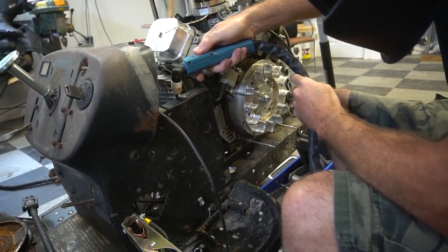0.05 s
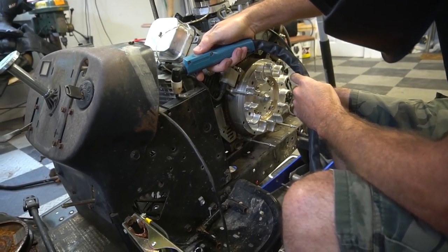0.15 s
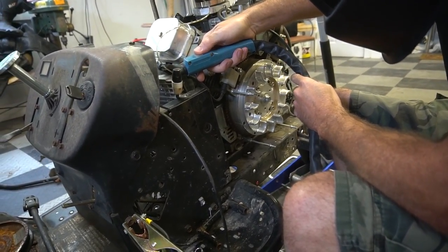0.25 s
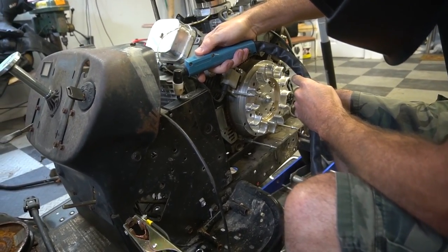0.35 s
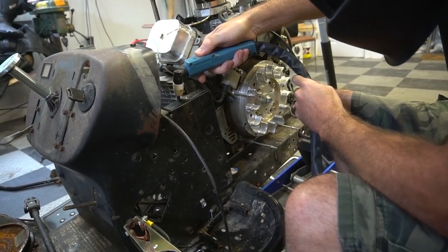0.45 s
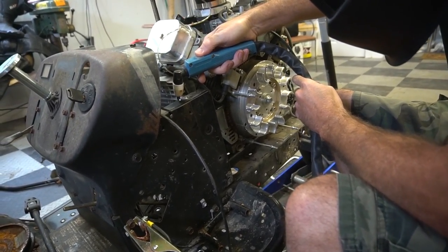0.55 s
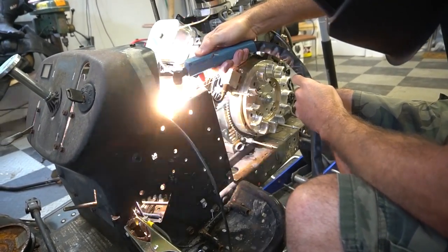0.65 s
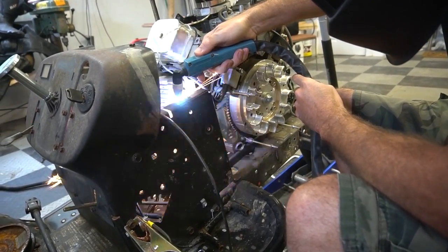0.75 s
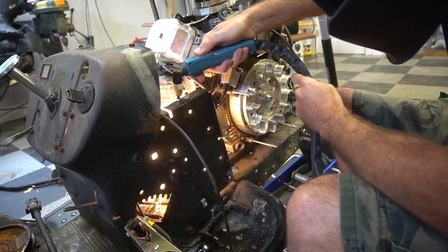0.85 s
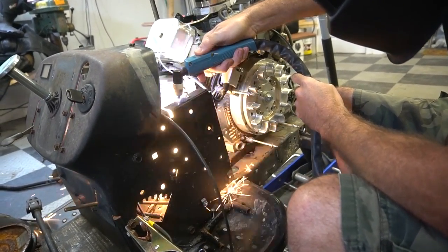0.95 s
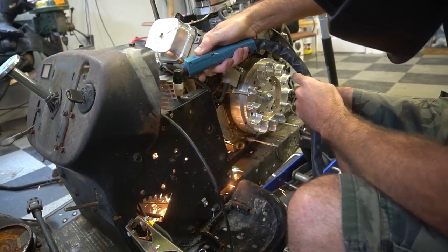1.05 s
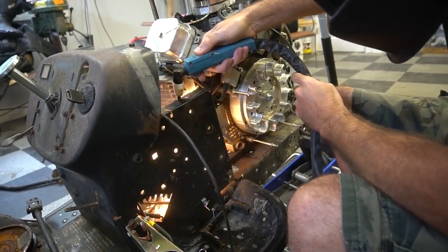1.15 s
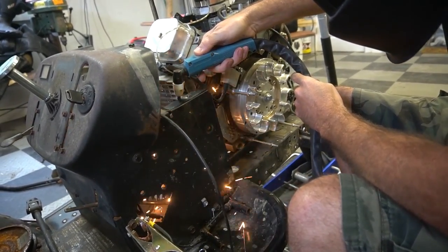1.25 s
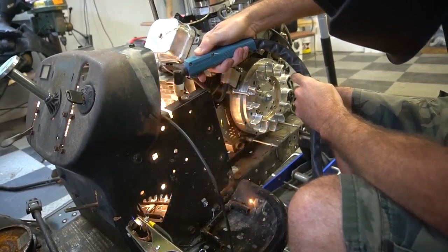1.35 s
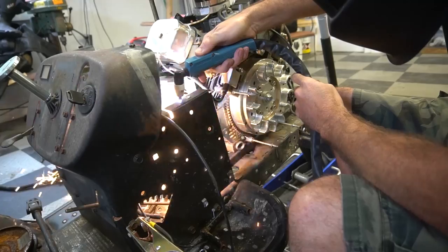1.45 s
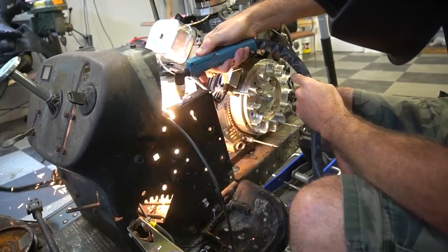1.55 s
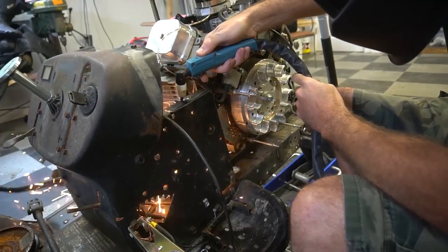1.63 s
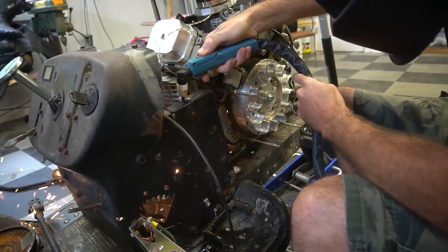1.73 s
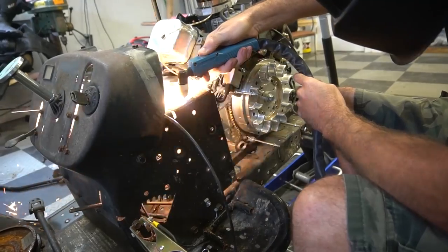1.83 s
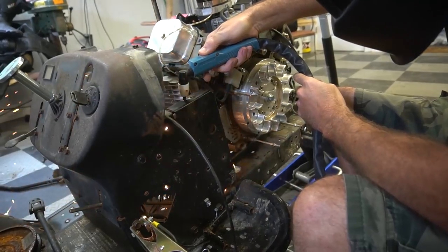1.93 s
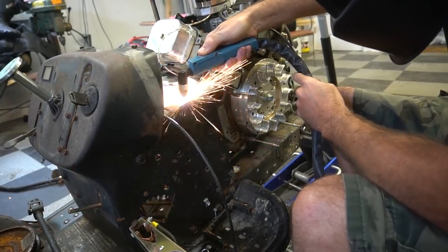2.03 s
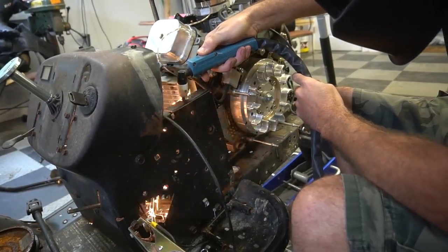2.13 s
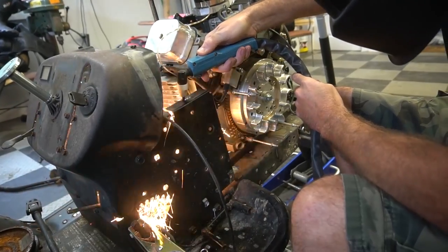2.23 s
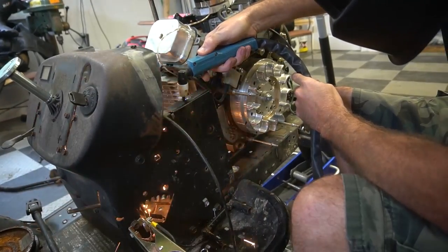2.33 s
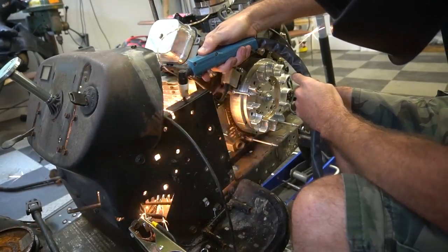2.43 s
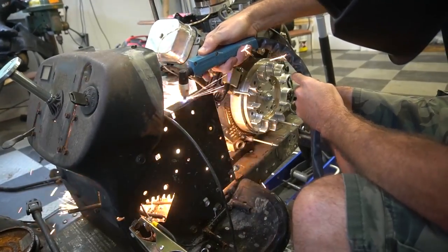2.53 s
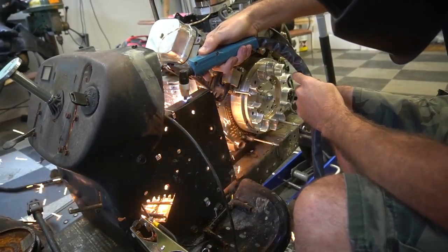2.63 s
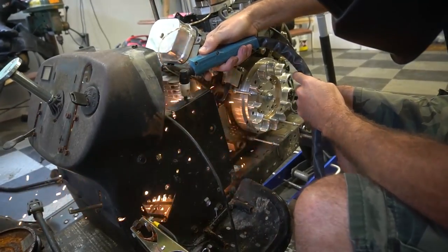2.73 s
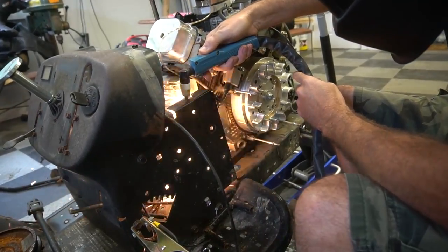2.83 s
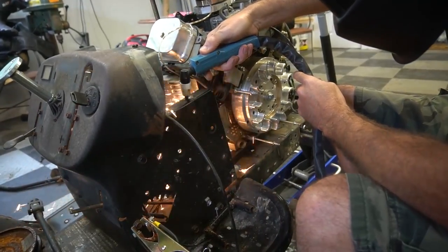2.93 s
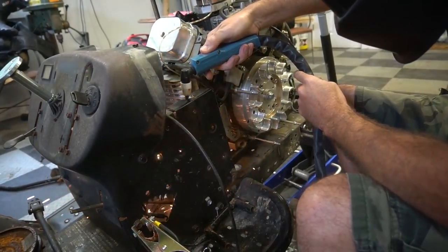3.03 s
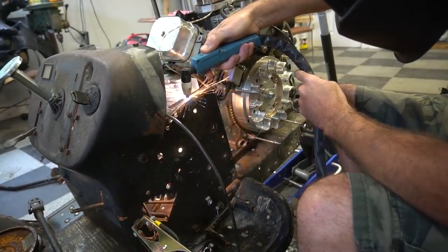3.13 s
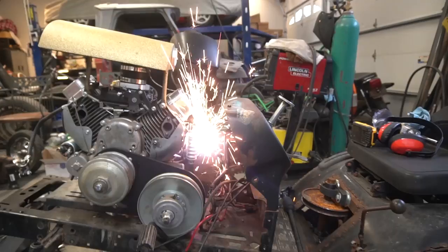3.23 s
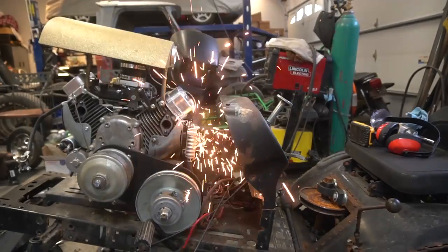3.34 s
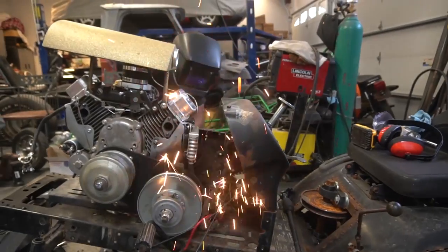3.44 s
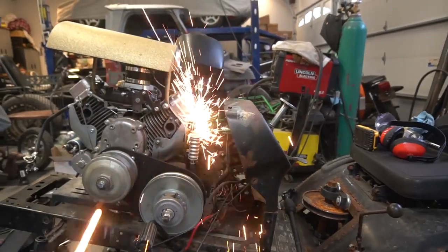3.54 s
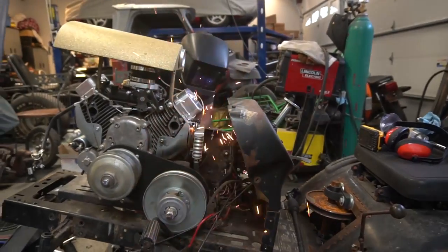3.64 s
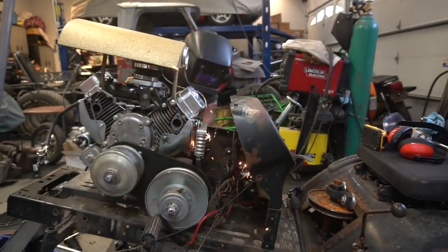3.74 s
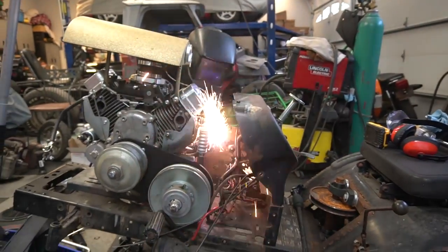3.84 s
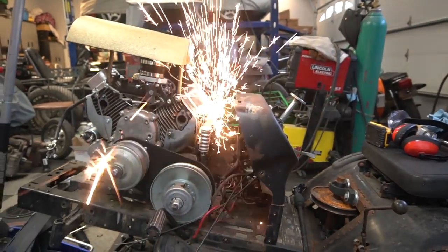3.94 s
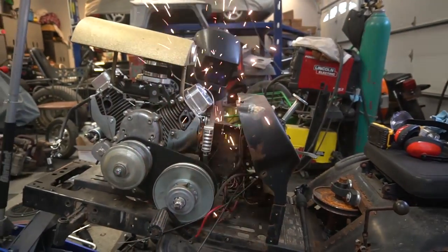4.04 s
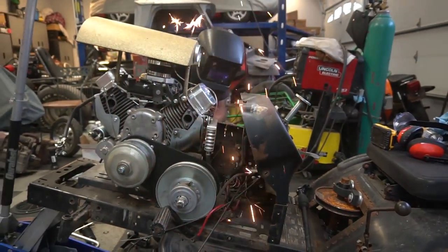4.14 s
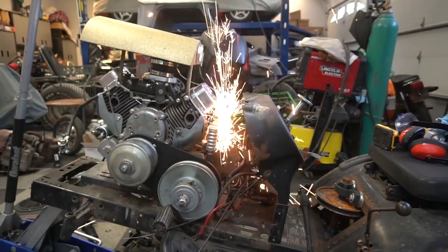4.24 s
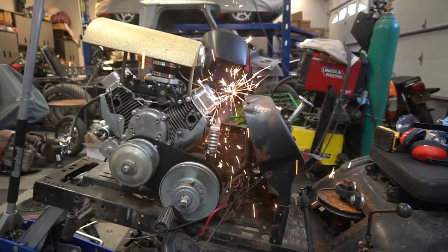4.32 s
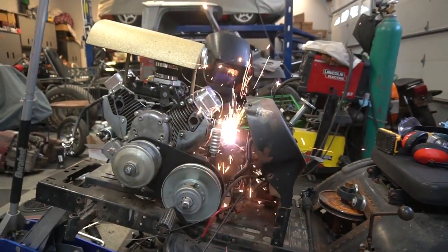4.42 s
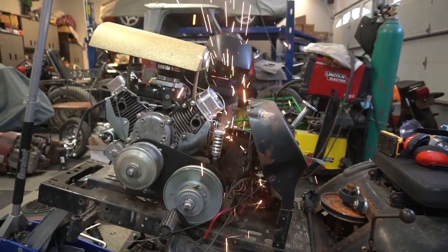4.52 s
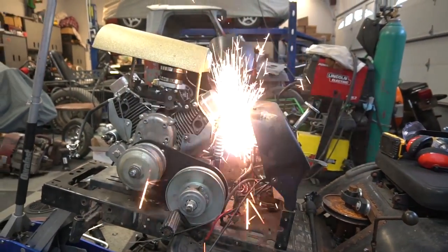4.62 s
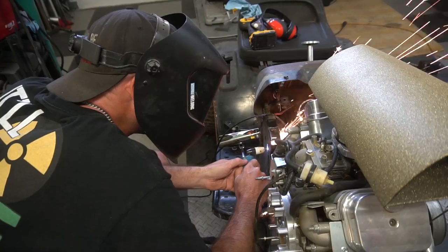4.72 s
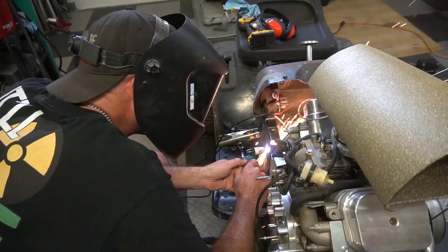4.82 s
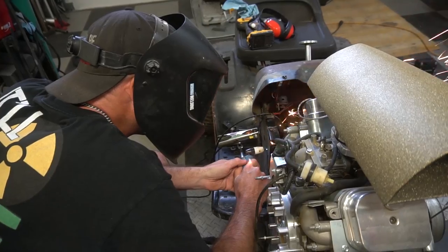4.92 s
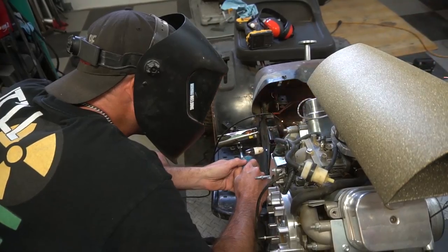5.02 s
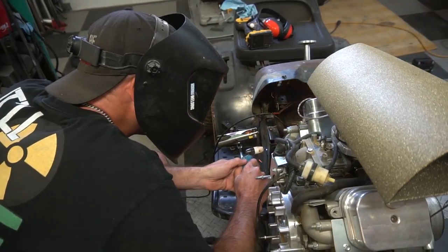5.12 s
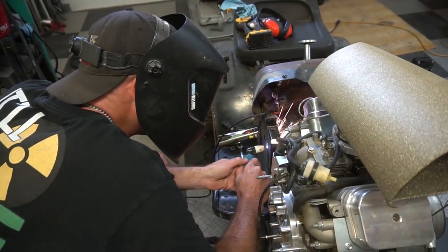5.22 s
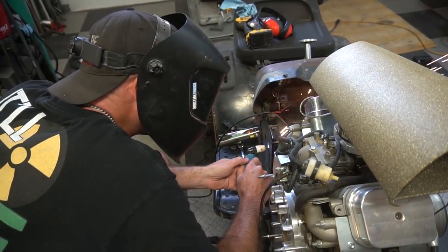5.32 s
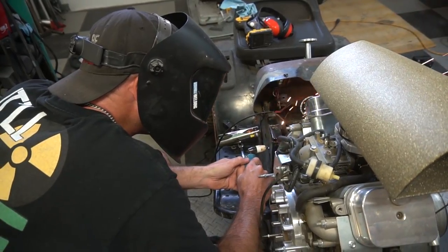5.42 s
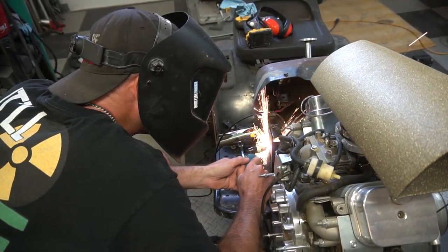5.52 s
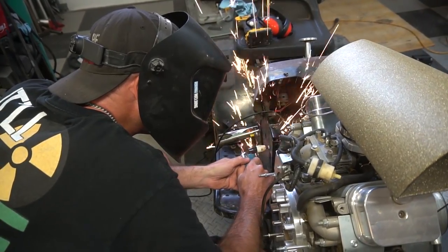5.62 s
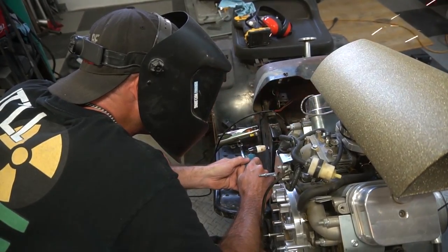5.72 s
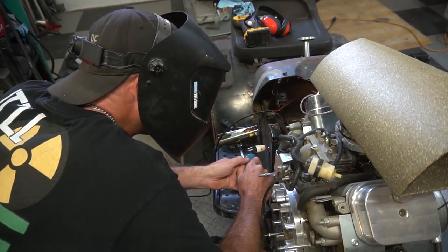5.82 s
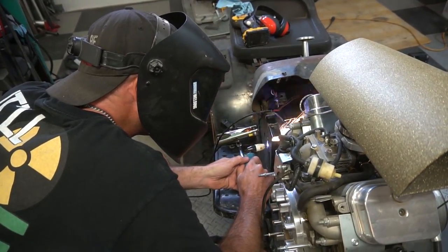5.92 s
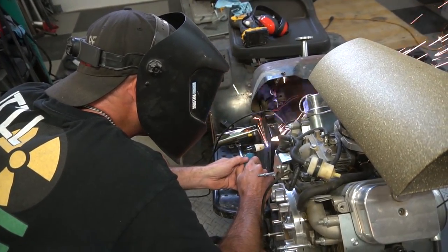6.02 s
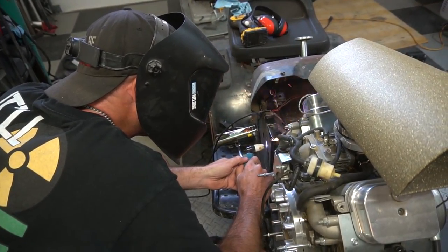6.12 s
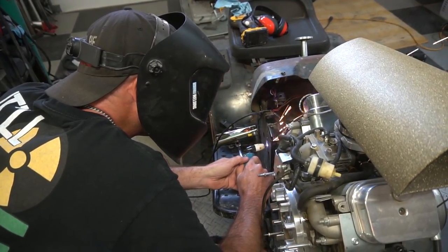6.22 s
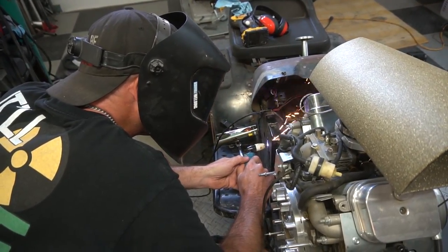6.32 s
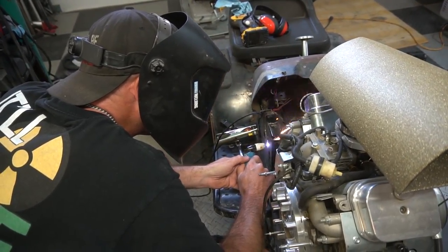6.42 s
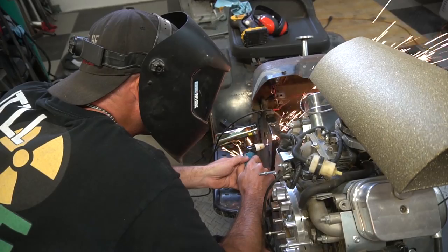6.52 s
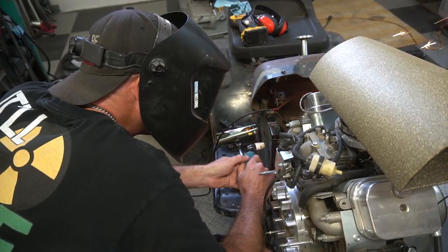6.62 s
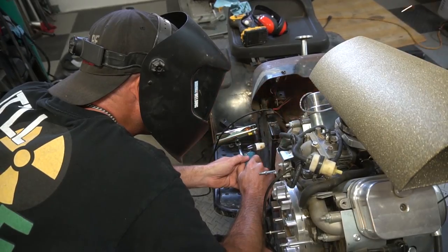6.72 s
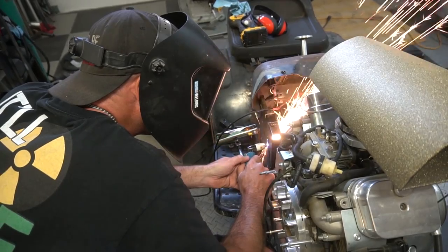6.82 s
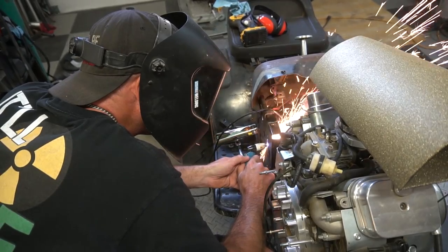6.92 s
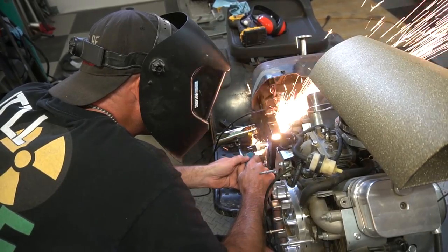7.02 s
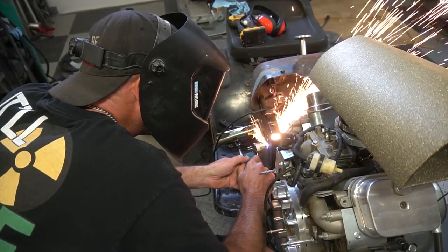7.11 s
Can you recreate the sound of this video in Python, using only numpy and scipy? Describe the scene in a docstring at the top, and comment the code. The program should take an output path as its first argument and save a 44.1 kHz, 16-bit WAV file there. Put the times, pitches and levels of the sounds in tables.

```python
"""A plasma torch in a garage. A quiet fan is heard first; at 0.6 s the valve ticks open and air hisses out.
Then the arc stutters: each strike cracks and thumps as the gas swells, the burning arc roars over the jet, and
its collapse sucks back with a low pop, while the machine frame rings along. The first arcs roar louder, until
the metal is pierced. At 3.3 s and 4.7 s the scene changes to another place with its own colour, three places in
all, heard in mono."""
import sys
import numpy as np
from scipy import signal
from scipy.io import wavfile
from scipy.ndimage import uniform_filter1d

SR = 44100
rng = np.random.default_rng(int(sys.argv[2]) if len(sys.argv) > 2 else 0)


def dump(signal):
    """Clip the signal to [-1, 1] and save it as 16-bit WAV at the path in sys.argv[1]."""
    limited = np.clip(np.atleast_2d(signal).T, -1, 1)
    pcm = np.round(limited * 32767).astype(np.int16)
    wavfile.write(sys.argv[1], SR, pcm)


N = 315880
T = np.arange(N) / SR
HZ = np.fft.rfftfreq(4096, 1 / SR)

# tone of the fan and stray air: (frequency [Hz], relative level [dB])
FAN_COLOUR = [(15, -20), (40, -6), (90, -6.5), (145, -17), (200, -9.5), (450, -19.5), (1000, -23.5),
              (2500, -22), (3000, -20.5), (4200, -25), (6000, -29), (7500, -28), (9400, -22),
              (11000, -27.5), (12500, -34), (15800, -36)]
# humps in the fan noise: (frequency [Hz], width [Hz], gain [dB])
FAN_HUMPS = [(286.4, 22, 12.5), (403, 23, 5.5), (576, 65, 13.5), (843, 66, 8)]
# fader of the fan bed: (time [s], level [dB])
FAN_LEVEL = [(0, -48.5), (.3, -51), (.58, -56.5), (1, -60), (7.16, -61)]
# decay of the garage: (frequency [Hz], t60 [s])
GARAGE_DECAY = [(100, 0.73), (500, 0.45), (2000, 0.59), (6000, 0.64), (15000, 0.3)]
# two dull knocks and a soft low bump: (time [s], level [dB], frequency [Hz], t60 [s])
BUMPS = [(1, -35, 280, 0.03), (.617, -36, 320, 0.022), (0.57, -39, 85, 0.051)]
# sharp ticks of the valve: (time [s], relative level [dB])
VALVE_TICKS = [(.6082, -18), (.6146, -20)]
# faders of the air jet: (time [s], bass level [dB], treble level [dB])
JET_LEVELS = [(0.589, -42, -73), (0.603, -36, -45), (0.63, -38, -37.5), (0.67, -41, -32),
              (0.712, -27, -30.5), (0.9, -28.5, -28.5), (1.8, -30, -26.5), (2.75, -30.5, -29),
              (3.19, -30.5, -27), (3.35, -37, -37), (4.1, -36, -35), (4.6, -33, -36.5), (5.0, -34.5, -31),
              (5.85, -37, -35), (6.8, -39, -35), (7.16, -36, -33.5)]
# tone of jet and arc: (frequency [Hz], jet at each place [dB] x 3, arc at each place [dB] x 3)
JET_ARC_COLOURS = [(40, -25, -53, -51, -28, -40, -51), (99, -13.5, -14.5, -24, 2, -19, -46),
                   (249, -11, -12, -14, -12, -36, 7), (513, -9.5, -8, -8, -7.5, -6, -7),
                   (844, -6, -12, -15, 8.5, -12, -7), (1250, -9.5, -4.5, -8, 8.5, -0.5, 4.5),
                   (1850, -4.5, -4.5, -6, 7, 1.5, 6), (3320, -4, -3.5, -6.5, 1.5, 1, 5.5),
                   (4300, -4, -6, -7.5, -1.5, -5, 1), (6270, -2.5, -5.5, -10, -0.5, -4.5, 2.5),
                   (7600, -1, -4.5, -4.5, -1, -5.5, 1.5), (11000, -2, -1.5, -9, 1.5, -5.5, 0.5),
                   (13300, 0.5, -0.5, -6.5, 4, -5.5, 1), (14900, -0.5, -4, -9, 0, -5.5, 0),
                   (16300, -3.5, -0.5, -2.5, 4, -11.5, -15)]
# per place, peaks and dips from the frame's hollows: (frequency [Hz], width [Hz], gain [dB])
HOLLOWS = [
    [(464, 270, 0), (644, 49, -1.5), (1010, 34, -9), (1370, 64, 2.5), (1515, 82, -7), (1750, 190, 4),
     (2130, 51, 6), (3023, 69, 7.5), (3500, 160, 5), (5030, 250, 5), (5370, 460, -4.5), (9170, 200, 5),
     (10130, 110, 6), (10980, 470, 5)],
    [(680, 50, -6), (1290, 90, 2), (1440, 58, -10), (2197, 34, 8), (2500, 62, -1), (2800, 41, -7),
     (3700, 70, 1.5), (3990, 72, 6.5), (7600, 200, 4.5), (8700, 200, 4.5), (10400, 200, 3.5),
     (10800, 240, 3), (12400, 200, -1), (14900, 150, -7)],
    [(273, 88, 1), (480, 140, -9.5), (573, 36, 5.5), (855, 120, 8), (1450, 72, -3), (1526, 52, -8.5),
     (1732, 43, 2), (2520, 29, 4), (3370, 120, 3.5), (3850, 140, 3), (5380, 77, 3.5), (7750, 190, 3),
     (8850, 470, 4), (10700, 290, 5.5)],
]
# per place, ringing sheet and cavities of the frame: (frequency [Hz], relative level [dB], t60 [s])
FRAME_MODES = [
    [(696, -4.5, 0.025), (1081, -1.5, 0.031), (1310, -2.5, 0.013), (2154, 2, 0.017), (2980, -19, 0.017)],
    [(860, -17, 0.033), (1290, 2, 0.016), (2210, 4, 0.031), (2530, 4, 0.026), (3970, -10, .015)],
    [(582, -16, 0.064), (900, -31, 0.053), (1094, -19, 0.08), (1342, 1, 0.023), (1765, 1, 0.027),
     (2520, 0.5, 0.028), (3140, -7, 0.027), (3820, -3, 0.018)],
]
# per place, swelling or collapsing gas: (frequency [Hz], relative level [dB], t60 [s])
POP_MODES = [
    [(306, 3.5, 0.013), (114.4, -8, 0.019), (840, 4, 0.0069)],
    [(370, 2.5, 0.012), (114, -6, 0.015), (886, -9.5, 0.023)],
    [(322, 4, 0.012), (109, -11, 0.02), (884, -5.5, 0.014)],
]
# tone of the crack: (frequency [Hz], relative level at each place [dB] x 3)
CRACK_COLOURS = [(306, -25, -6, -22.5), (1060, -1, 0.5, 0.5), (2030, 4, -5, 2.5), (4040, 2, -12, -8),
                 (8160, 8, -24, -37), (15800, -20, -18, -38)]
# per place, envelope of the crack: (attack [s], decay [s], noise trim [dB])
CRACK_SHAPES = [(.0001, 0.005, 4), (.0005, 0.0024, -3.5), (.002, 0.0036, -3)]
# cue list of arcs, levels before trims: (strike [s], collapse [s], crack [dB], pop [dB], fizz [dB])
ARCS = [(.7171, .7769, -24, -34, -24), (.8334, .8693, -27, -32, -25), (.8949, 0.927, -27, -32, -24.5),
        (0.9974, 1.036, -30, -34, -23.5), (1.161, 1.203, -31, -34, -24), (1.3647, 1.41, -25, -35, -28.5),
        (1.4504, 1.478, -29.5, -33.5, -26), (1.522, 1.552, -29, -33, -29), (1.559, 1.57, -46, -44, -34),
        (1.6024, 1.6356, -31.5, -35.5, -26.5), (1.8823, 1.9277, -27.5, -35, -31),
        (2.1165, 2.159, -25, -34, -35), (2.243, 2.28, -32, -35, -26.5), (2.4488, 2.487, -27.5, -36, -25),
        (2.553, 2.5932, -30, -33.5, -25), (2.6215, 2.6511, -28, -35.5, -24),
        (2.726, 2.7604, -28, -35, -25.5), (2.8758, 2.91, -27, -35.5, -24.5),
        (2.961, 2.9867, -28.5, -38, -25), (3.22, 3.2594, -29.5, -36, -24),
        (3.2595, 3.3304, -37, -35, -29.5), (3.5451, 3.597, -41, -35.5, -26.5),
        (3.901, 3.9741, -38, -36.5, -28.5), (4.2313, 4.316, -41, -45, -29.5),
        (4.452, 4.522, -24, -36.5, -28.5), (4.6535, 4.72, -42, -38.5, -29.5),
        (4.724, 4.7653, -21.5, -33.5, -33.5), (4.794, 4.832, -21.5, -36, -35),
        (4.8612, 4.915, -21, -39, -29), (5.2566, 5.3141, -20, -35, -30),
        (5.3452, 5.3734, -21.5, -34.5, -30), (5.409, 5.449, -20, -37, -32), (5.592, 5.673, -34, -40, -31),
        (5.998, 6.0662, -22.5, -35.5, -33), (6.0887, 6.1153, -21, -34.5, -30.5),
        (6.1335, 6.155, -28, -35, -30.5), (6.1844, 6.2317, -21, -34, -32), (6.2545, 6.28, -20, -35, -30),
        (6.303, 6.3321, -30, -32.5, -31), (6.3479, 6.382, -23.5, -35, -29.5),
        (6.4025, 6.4324, -19.5, -36, -31.5), (6.455, 6.4807, -29, -36.5, -31.5),
        (6.5057, 6.5556, -18.5, -42, -31.5), (6.8385, 6.932, -34.5, -40.5, -33),
        (6.968, 7.0229, -34, -37.5, -34.5), (7.0543, 7.13, -25.5, -39, -34), (7.157, 7.187, -27, -39, -35)]
STRIKE, COLLAPSE, CRACK_DB, POP_DB, FIZZ_DB = np.transpose(ARCS)

CHANGES_S, CROSSFADE_S = [3.3, 4.715], 0.047  # the scene changes from one place to the next
# one value per place
REVERB_DB, ROAR_TRIM_DB = [-10, -9, -7], [-11.5, -5, -5]
THUMP_DB, COLLAPSE_RING_DB = [1.5, 0.5, -4], [3, -3, 6]  # trims on each arc's pop level
THUMP_LAG_S = [0.00017, 0.00026, 0.00312]  # behind the crack

SAG_DB, SAG_S = -1, 0.06  # the jet ducks after each collapse
HEAT_DB, HEAT_S = 2.5, 0.062  # each arc leaves the jet's bass louder for a while
PIERCE_DB, PIERCE_S = 6, 0.6  # extra roar until the metal is pierced
LINGER_S = 0.0027  # the roar outlasts the collapse
REFILL_S = 0.0099  # a strike right after a collapse finds the gas still hot and barely thumps


def amp(db):
    """Gain of a level in dB."""
    return 10 ** (np.asarray(db) / 20)


def curve(points, hz=HZ):
    """Reads a (frequency, value) table along log frequency."""
    f, value = np.transpose(points)
    return np.interp(np.log(hz + 1), np.log(f + 1), value)


def tone(table, column):
    """EQ curve from one dB column of a colour table."""
    return amp(curve(np.array(table)[:, [0, column]]))


def humps(bells):
    """EQ curve of bell-shaped peaks and dips."""
    return amp(sum(db / (1 + (2 * (HZ - hz) / width) ** 2) for hz, width, db in bells))


def coloured(x, gain):
    """Minimum-phase EQ of unit energy."""
    log_gain = np.log(np.maximum(gain / gain.max(), 1e-5))
    mirrored = np.concatenate([log_gain, log_gain[-2:0:-1]])
    taps = np.fft.ifft(np.exp(np.conj(signal.hilbert(mirrored)))).real
    return signal.oaconvolve(x, taps / np.linalg.norm(taps))[:N]


def crossover(bass, treble, gain):
    """Joins two noises at 4 kHz under one EQ curve."""
    low = 1 / (1 + (HZ / 4000) ** 4)
    share = np.sum(gain ** 2 * low) / np.sum(gain ** 2)
    return (np.sqrt(share) * coloured(bass, gain * np.sqrt(low))
            + np.sqrt(1 - share) * coloured(treble, gain * np.sqrt(1 - low)))


def train(times, sizes):
    """Impulses at the given times, with one size for all or one each."""
    at = np.round(np.asarray(times) * SR).astype(int)
    return np.bincount(at[at < N], np.broadcast_to(sizes, at.shape)[at < N], N)


def trigger(hits, shape):
    """Plays a shape at every impulse."""
    return signal.oaconvolve(hits, shape)[:N]


def ring(hz, db, t60, rise=0.0001):
    """One dying mode with a soft attack."""
    t = T[:4000]
    return amp(db - 60 * t / t60) * np.sin(2 * np.pi * hz * t) * (1 - np.exp(-t / rise))


def waver(span, depth_db):
    """Random gain that drifts over about span samples."""
    drift = uniform_filter1d(rng.standard_normal(N), span)
    return amp(depth_db * drift / np.sqrt(np.mean(drift ** 2)))


def flutter(span, depth_db):
    """White noise with a wavering level."""
    return rng.standard_normal(N) * waver(span, depth_db)


def fan():
    """A quiet bed of fan noise with fuzzy humps, sinking over the first second."""
    level = amp(np.interp(T, *np.transpose(FAN_LEVEL)))
    return level * coloured(flutter(1700, 0.65), tone(FAN_COLOUR, 1) * humps(FAN_HUMPS))


def garage(x):
    """Reverb: a reflection of random sign in every 20 samples, each band dying at its own speed."""
    taps = np.zeros(SR)
    slots = np.arange(300, SR - 20, 20)
    taps[slots + rng.integers(0, 20, len(slots))] = rng.choice([-1., 1.], len(slots))
    hz, t, bands = signal.stft(taps, SR, nperseg=256)
    decay = amp(-60 * t / curve(GARAGE_DECAY, hz)[:, None])
    tail = signal.istft(bands * decay, SR, nperseg=256)[1]
    return signal.fftconvolve(x, tail / np.linalg.norm(tail))[:N]


def bumps():
    """A soft low bump just before the air opens, a dull knock as it opens and another at 1 s."""
    return sum(trigger(train([s], 1), ring(hz, db, t60)) for s, db, hz, t60 in BUMPS)


def valve():
    """Two sharp ticks as the air opens."""
    times, levels = np.transpose(VALVE_TICKS)
    return trigger(train(times, amp(levels)), ring(hz=13500, db=9, t60=0.0007, rise=0.00002))


def air_jet():
    """Turbulent hiss as (bass, treble): after each collapse the treble ducks and the bass swells."""
    times, *faders = np.transpose(JET_LEVELS)
    sag_db = trigger(train(COLLAPSE, SAG_DB), np.exp(-T[:30000] / SAG_S))
    heat_db = trigger(train(COLLAPSE, HEAT_DB), np.exp(-T[:30000] / HEAT_S))
    bass, treble = (amp(np.interp(T, times, db, left=-120) + sag_db) for db in faders)
    return bass * amp(heat_db) * flutter(770, 0.76), treble * flutter(790, 0.94)


def frame_ring(place):
    """Strike and collapse knock the machine frame in opposite directions and set it ringing."""
    knocks = train(STRIKE, amp(CRACK_DB)) - train(COLLAPSE, amp(POP_DB + COLLAPSE_RING_DB[place]))
    attack = CRACK_SHAPES[place][0]
    return trigger(knocks, sum(ring(*mode, rise=attack) for mode in FRAME_MODES[place]))


def gas_pops(place):
    """Gas swells at the strike (a thump, pressure first) and shrinks at collapse (a pop, suction first)."""
    pause = np.maximum(STRIKE - np.append(0, COLLAPSE[:-1]), 0)
    refilled = 1 - np.exp(-(pause / REFILL_S) ** 2)
    thumps = train(STRIKE + THUMP_LAG_S[place], amp(POP_DB + THUMP_DB[place]) * refilled)
    suction = train(COLLAPSE, amp(POP_DB))
    body = amp(10.5) * sum(ring(*mode, rise=0.00066) for mode in POP_MODES[place])
    return trigger(thumps - suction, body)


def strike_cracks(place):
    """Each strike spits a few milliseconds of noise."""
    attack, decay, trim_db = CRACK_SHAPES[place]
    burst = (1 - np.exp(-T[:900] / attack)) * np.exp(-T[:900] / decay)
    envelope = trigger(train(STRIKE, amp(CRACK_DB + trim_db)), burst / burst.max())
    return envelope * rng.standard_normal(N)


def arc_roar():
    """The burning arc as (bass, treble): gated noise that opens with a surge of current, ends in a rush."""
    on = train(STRIKE, amp(FIZZ_DB))
    off = train(COLLAPSE + LINGER_S, amp(FIZZ_DB))
    surge = trigger(on, 0.16 * np.exp(-T[:3000] / 0.0032))
    rush = trigger(off, 0.48 * np.exp(-T[:3000] / 0.006))
    flame = uniform_filter1d(np.cumsum(on - off) + surge + rush, 40)  # softens the gate's edges
    sputter = waver(span=600, depth_db=1.02)  # the arc wanders in the kerf
    piercing = amp(PIERCE_DB * np.exp(-((T - STRIKE[0]) / PIERCE_S) ** 2))
    return flame * piercing * sputter * flutter(120, 2.9), flame * np.sqrt(sputter) * flutter(40, 2.0)


def torch(place, jet, arc):
    """The torch at one place: hiss, roar, cracks and pops through the frame's hollows, plus its ring."""
    hollows = humps(HOLLOWS[place])
    arc_bass, arc_treble = arc
    arc_eq = tone(JET_ARC_COLOURS, 4 + place) * hollows
    hiss = crossover(*jet, tone(JET_ARC_COLOURS, 1 + place) * hollows)
    roar = crossover(amp(ROAR_TRIM_DB[place]) * arc_bass, arc_treble, arc_eq)
    cracks = coloured(strike_cracks(place), tone(CRACK_COLOURS, 1 + place) * hollows)
    pops = coloured(gas_pops(place), hollows)
    return hiss + roar + cracks + pops + frame_ring(place)


def scene():
    """Torch and reverb crossfade at equal power from place to place, over valve, bumps and fan bed."""
    changes = [np.clip((T - s) / CROSSFADE_S + 0.5, 0, 1) for s in CHANGES_S]
    arrived = [np.ones(N), *changes, np.zeros(N)]
    work, jet, arc = bumps() + valve(), air_jet(), arc_roar()
    for place in range(3):
        direct = torch(place, jet, arc)
        fader = np.sqrt(arrived[place] - arrived[place + 1])
        work += fader * (direct + amp(REVERB_DB[place]) * garage(direct))
    low_cut = signal.butter(2, 90, "high", fs=SR, output="sos")  # thins the deep bass of all but the fan
    mix = fan() + signal.sosfilt(low_cut, work)
    return np.array([mix, mix])


def record(dry):
    """A steep high cut takes off the very top."""
    high_cut = signal.firwin(1023, 15790, window=("kaiser", 9), fs=SR)
    return signal.oaconvolve(dry, high_cut[None], "same")


dry = scene()
out = record(dry)
dump(out)
```